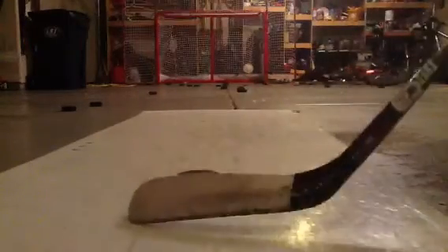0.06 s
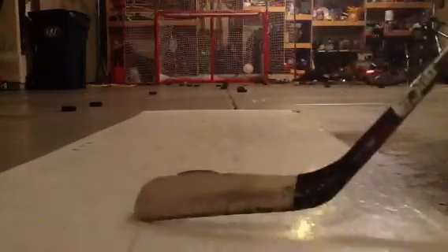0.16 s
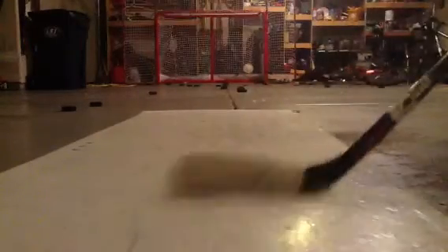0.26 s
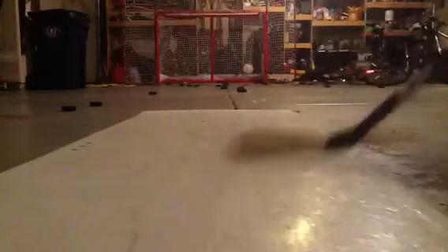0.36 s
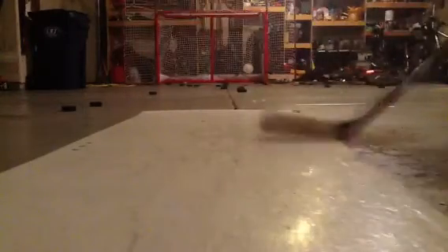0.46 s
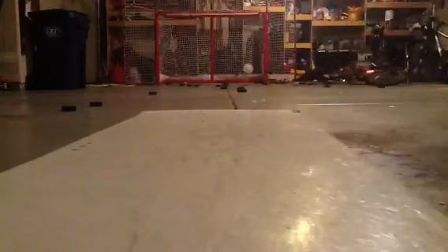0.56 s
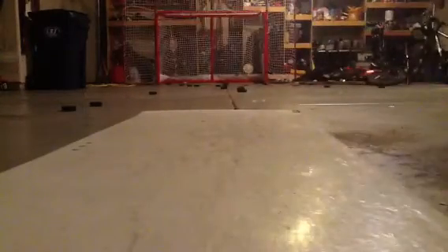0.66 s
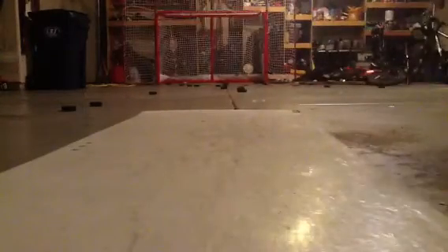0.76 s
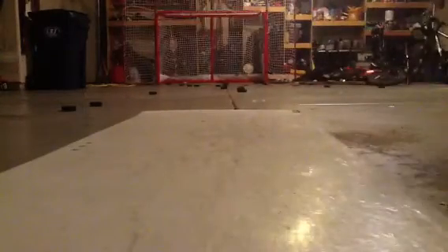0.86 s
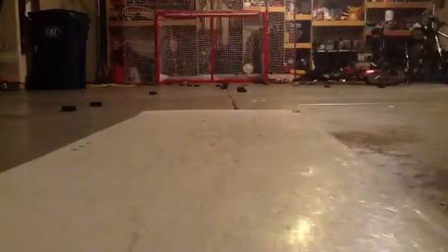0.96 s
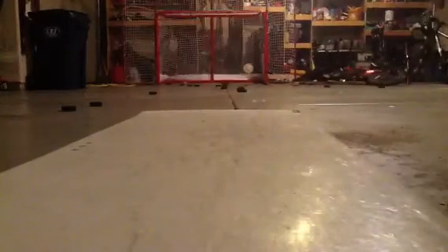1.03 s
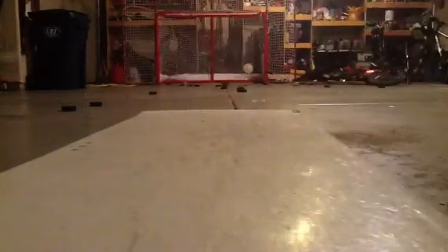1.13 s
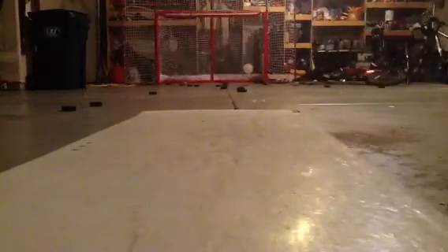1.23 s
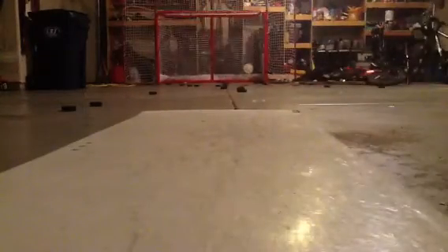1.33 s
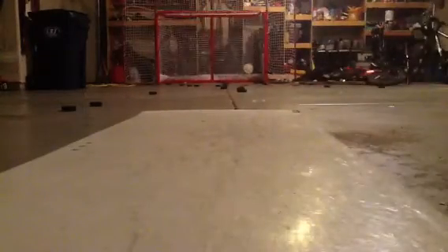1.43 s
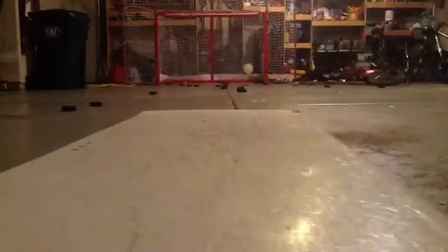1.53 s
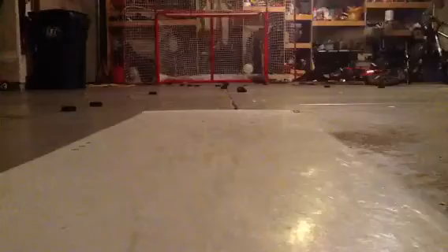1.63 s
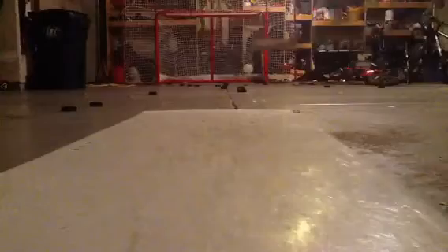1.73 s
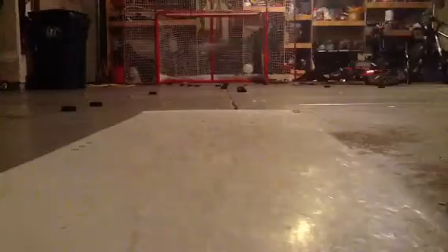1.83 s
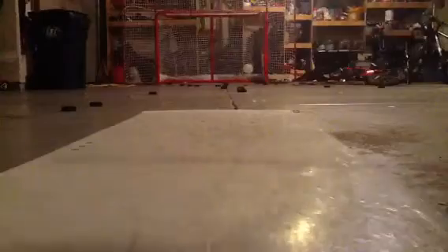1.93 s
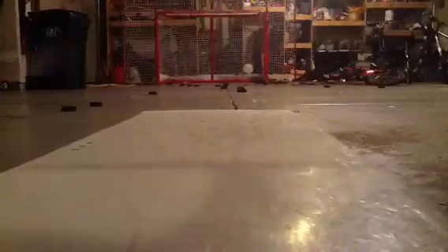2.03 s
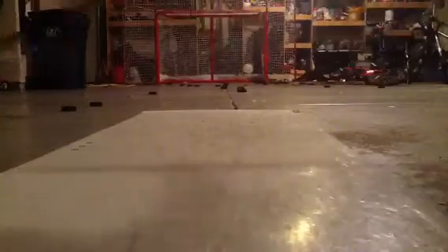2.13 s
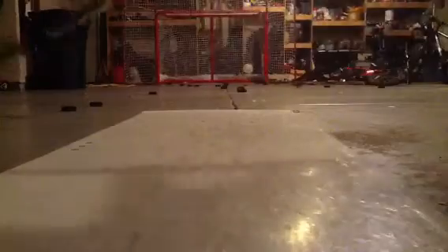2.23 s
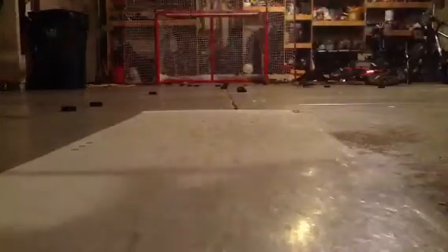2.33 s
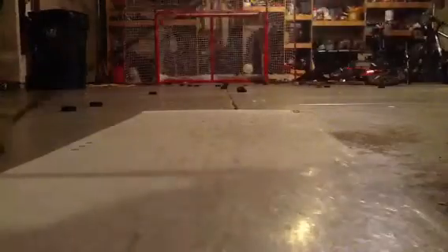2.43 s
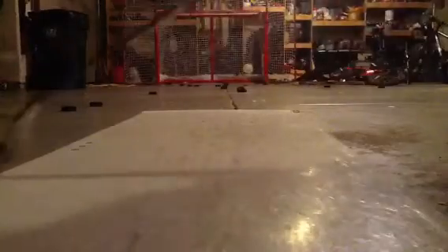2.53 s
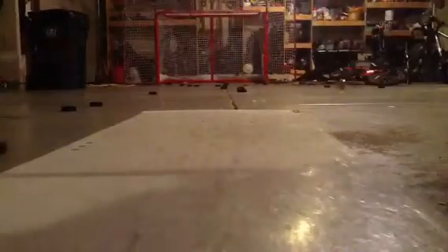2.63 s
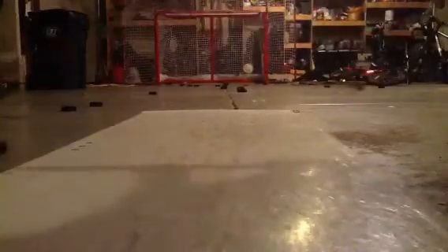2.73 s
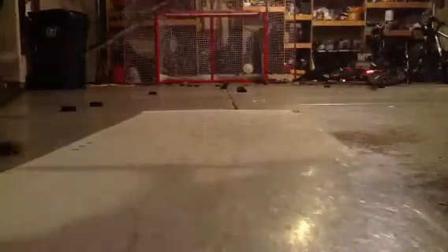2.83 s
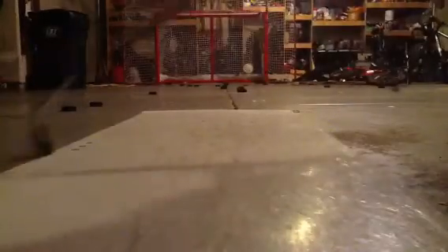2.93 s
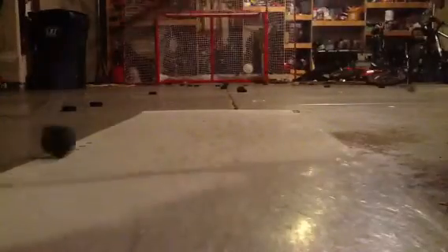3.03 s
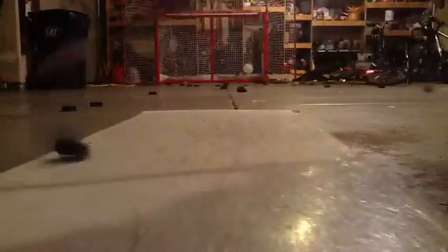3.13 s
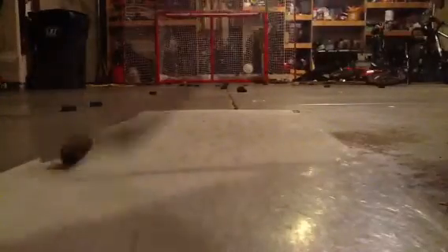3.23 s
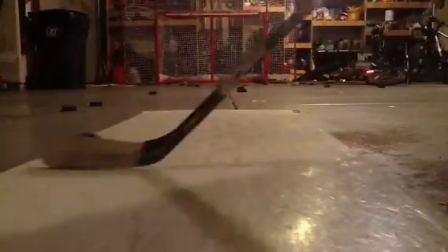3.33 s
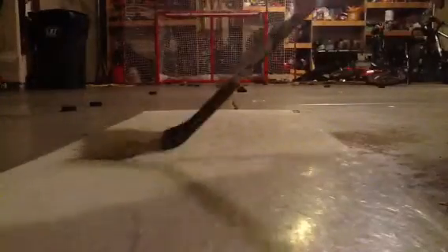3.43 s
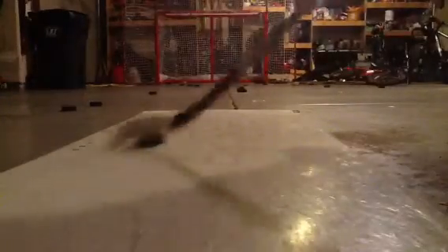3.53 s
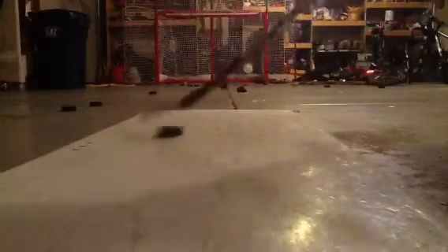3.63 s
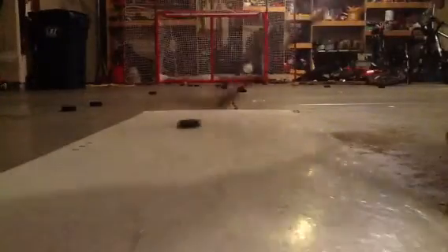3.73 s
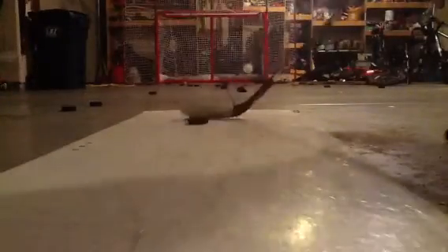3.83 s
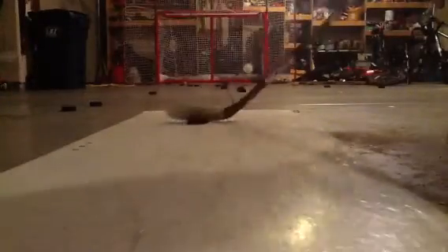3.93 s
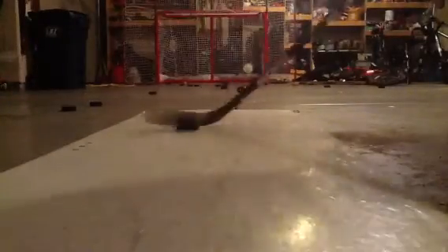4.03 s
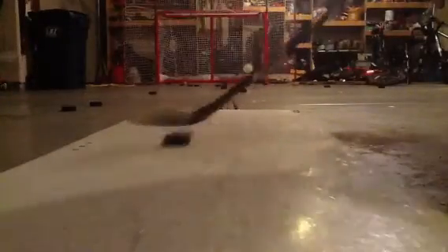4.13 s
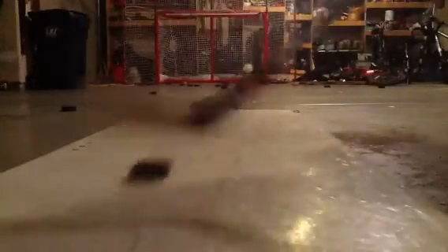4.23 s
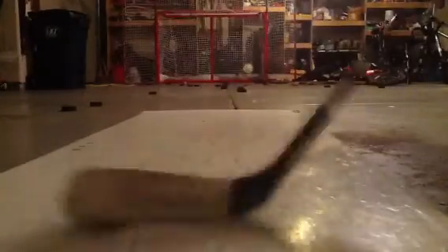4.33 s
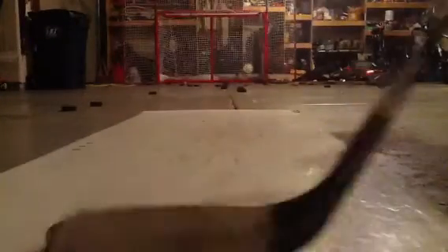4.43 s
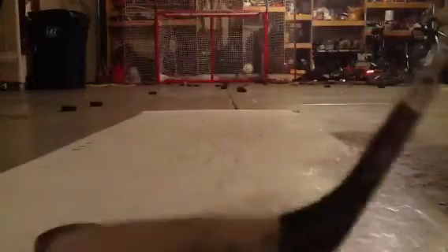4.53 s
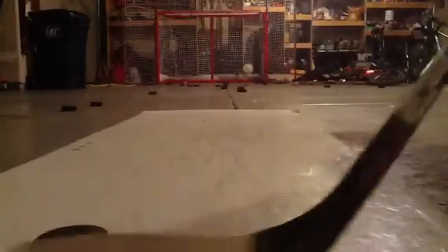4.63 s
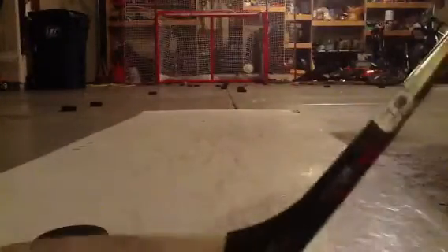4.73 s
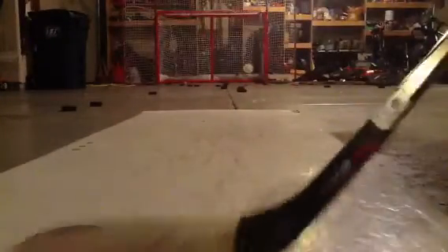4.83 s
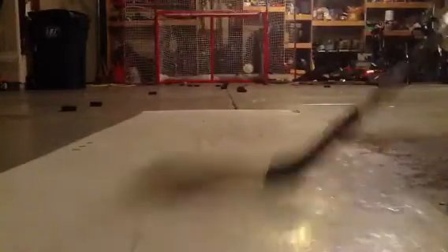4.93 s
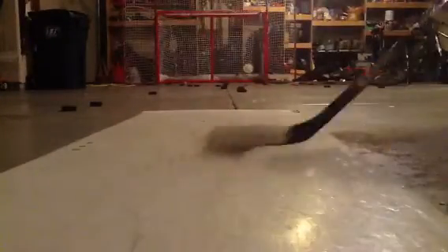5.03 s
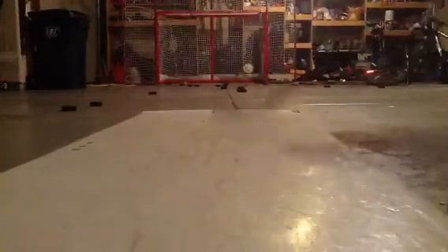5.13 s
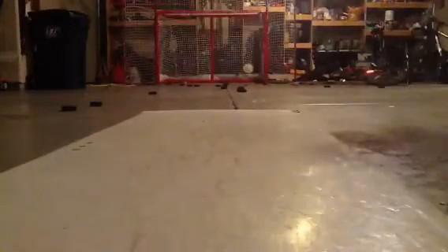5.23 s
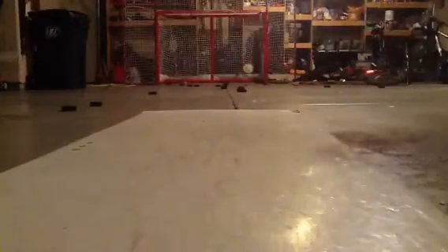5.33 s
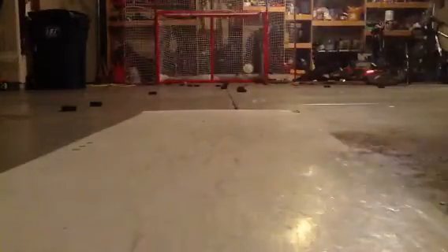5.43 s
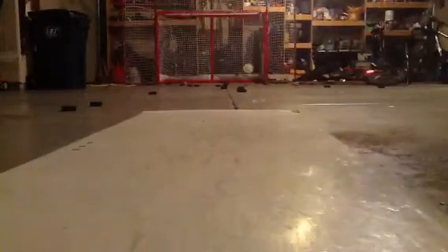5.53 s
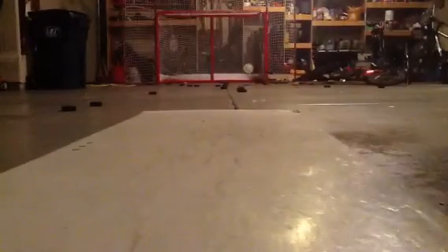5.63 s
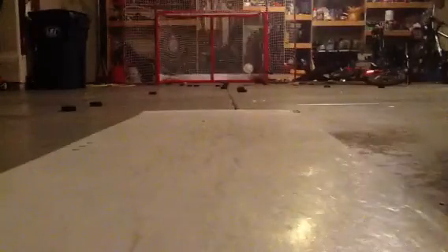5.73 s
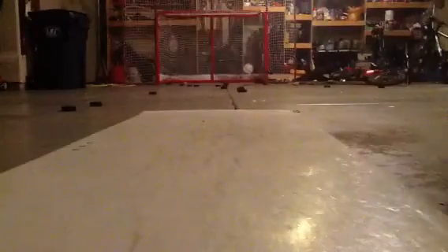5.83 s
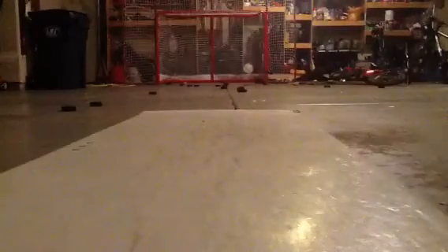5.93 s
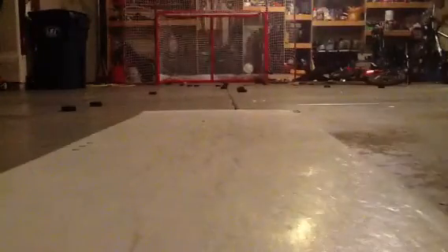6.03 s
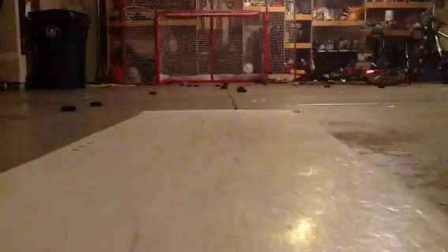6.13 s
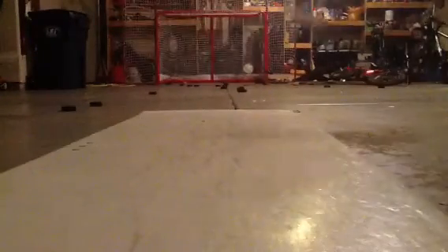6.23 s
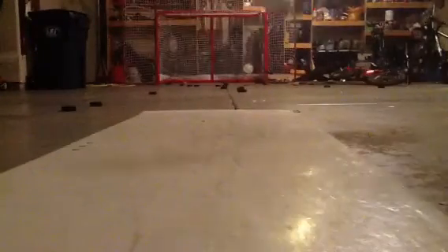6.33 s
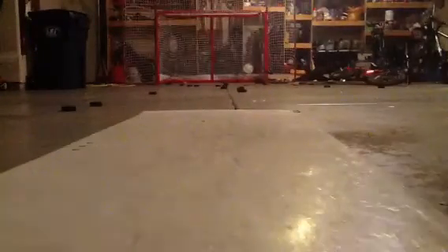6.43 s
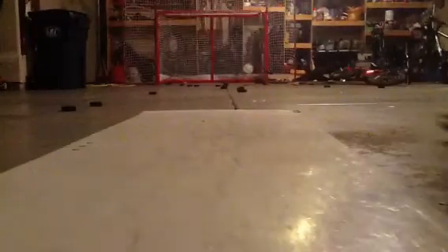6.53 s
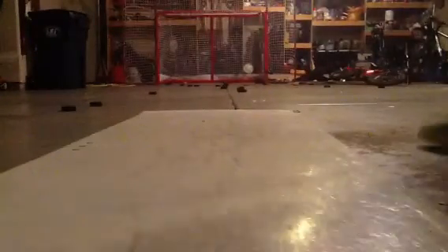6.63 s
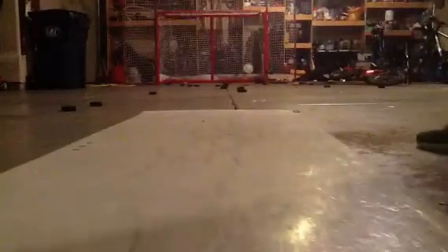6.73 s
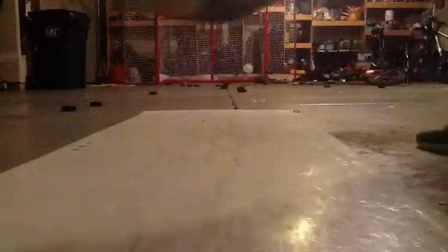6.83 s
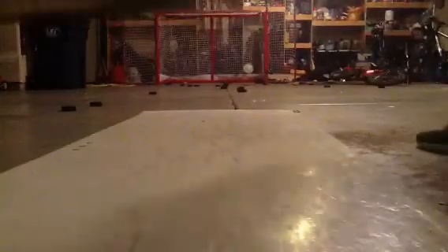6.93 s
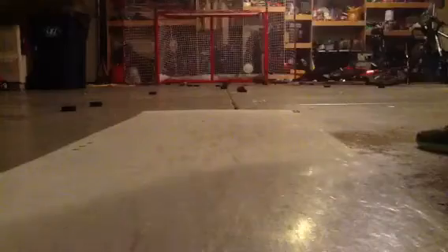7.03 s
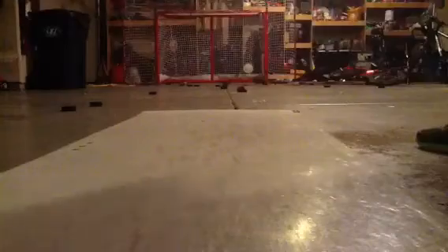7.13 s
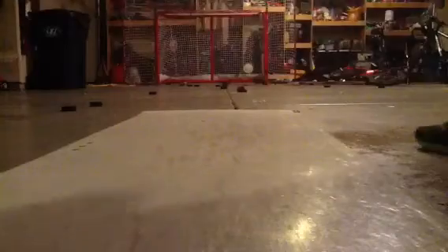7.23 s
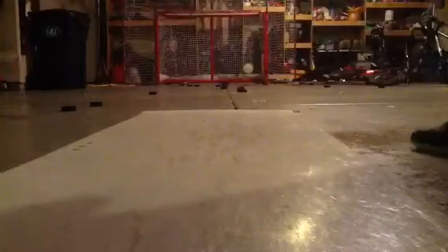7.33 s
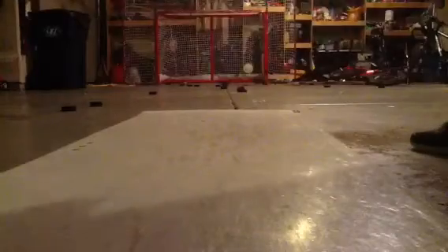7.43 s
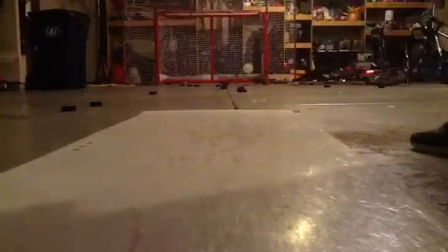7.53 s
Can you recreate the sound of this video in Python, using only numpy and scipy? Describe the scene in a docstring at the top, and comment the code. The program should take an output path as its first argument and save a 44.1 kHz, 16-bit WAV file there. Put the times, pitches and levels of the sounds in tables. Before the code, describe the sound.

Heard close to the floor in a small bare garage, a taped hockey blade rasps and slaps a puck away; it swishes into the net and thumps and tumbles at the far end. After a short lull come hard taps, gritty slides, a squeaky fierce scrape and a sharp double slap, then heavy distant thuds. Faint scuffs and one last clack follow over quiet hiss.

```python
"""Hockey practice in a small garage

Heard from floor level beside a plastic shooting board: a taped blade drags, taps and slaps pucks.
The rasp and swishes are coloured noise, the blows are short chatter with ringing modes,
and the thumps are swelling bands of noise with a hollow note. Pucks swish into the net, thump against
the far end and tumble; the bare room rings after every blow as decaying noise. A quiet hiss lies below."""
import sys
import numpy as np
from scipy import signal
from scipy.fft import rfft, irfft, next_fast_len
from scipy.io import wavfile
from scipy.ndimage import uniform_filter1d

SR = 44100
rng = np.random.default_rng(int(sys.argv[2]) if len(sys.argv) > 2 else 0)


def transcribe(u):
    """Save the signal u as a 16-bit wav file named by the first command-line argument.

    u: samples, shape (n,) or (channels, n), limited to [-1, 1]; the rate is SR.
    q: integer samples, one column per channel.
    """
    v = np.clip(np.atleast_2d(u).T, -1, 1)
    q = np.round(v * 32767).astype(np.int16)
    wavfile.write(sys.argv[1], SR, q)


N = 334392
TIME = np.arange(N) / SR
BITE_DB_PER_S, LIFT_DB_PER_S = 325.5, 420.5  # how fast the blade takes hold and lets go


def amp(db):
    """Decibels to gain."""
    return 10 ** (np.asarray(db) / 20)


def unit(x):
    """Scales to rms 1."""
    return x / np.sqrt(np.mean(x ** 2) + 1e-20)


def read(points, hz):
    """Reads a table of (Hz, value) on a log-frequency axis."""
    f, value = np.transpose(points)
    return np.interp(np.log(hz + 1), np.log(f + 1), value)


def add(mix, start_s, sound):
    """Mixes a sound in at a time."""
    part = mix[max(round(start_s * SR), 0):][:len(sound)]
    part += sound[:len(part)]


def shape(x, points):
    """Filters x by a table of (Hz, dB)."""
    size = next_fast_len(len(x))
    gain = amp(read(points, np.fft.rfftfreq(size, 1 / SR)))
    return irfft(rfft(x, size) * gain, size)[:len(x)]


def colour(x, points):
    """Filters x by a table of (Hz, dB), then scales it to rms 1."""
    return unit(shape(x, points))


def band(x, lo_hz, hi_hz, order=3):
    """Causal band-pass."""
    edges = [lo_hz, min(hi_hz, .48 * SR)]
    return signal.sosfilt(signal.butter(order, edges, "band", fs=SR, output="sos"), x)


def wander(count, size):
    """Smooth chance of rms 1 that changes over about size samples."""
    noise = rng.standard_normal(count)
    return unit(uniform_filter1d(uniform_filter1d(noise, size), size))


def gesture(start_s, length_s, db, swell_db, attack_db_per_s, release_db_per_s):
    """Gain of one motion: a rise up to start_s, a hold that swells or sags, then a release."""
    end_s = start_s + length_s
    hold = db + swell_db * np.clip((TIME - start_s) / length_s, 0, 1)
    attack = attack_db_per_s * np.clip(start_s - TIME, 0, 1)
    release = release_db_per_s * np.clip(TIME - end_s, 0, 1)
    return amp(hold - attack - release)


def hiss(level_db=-59):
    """Steady background noise with a fixed spectrum."""
    # colour of the hiss: hz, relative_db
    hiss_colour = [(25, -23), (70, -11.5), (180, 17), (400, 4.5), (800, -12), (2000, -3.5), (5000, -12),
                   (10000, -11.5), (15500, -11)]
    return amp(level_db) * colour(rng.standard_normal(N), hiss_colour)


def garage_tail(build_s=0.002):
    """The dense ring of the bare room: freshly drawn noise whose highest treble dies first."""
    # decay of the bare room: hz, t60_s
    room_decay = [(120, 0.5), (350, 0.93), (1000, 0.82), (2800, 0.89), (5000, 0.77), (9000, 0.57),
                  (15000, 0.16)]
    t, hz = np.arange(0, SR, 256) / SR, np.fft.rfftfreq(512, 1 / SR)[:, None]
    real, imag = rng.standard_normal((2, len(hz), len(t)))
    decay = amp(-60 * t / read(room_decay, hz))
    tail = signal.istft((real + 1j * imag) * decay, nperseg=512)[1]
    return 0.00099 * (1 - np.exp(-TIME[:len(tail)] / build_s)) * tail


def garage(x):
    """Reverberation of the longer sounds: each moment sets off the coloured ring of the room."""
    # colour of the reverberation: hz, gain_db
    room_colour = [(100, 4), (220, -0.5), (450, -1.5), (1000, -3.5), (2800, -3), (6000, -6.5),
                   (13000, -0.5)]
    return signal.fftconvolve(x, shape(garage_tail(), room_colour))[:N]


def net(flutter_db=0.5, rise_db_per_s=676, sag_db_per_s=23, settle_db_per_s=218):
    """Mesh and backing are jolted, rustle unevenly and settle; a faint shoe scuff shares their coloured noise."""
    # swishes of the net and its backing, and a faint shoe scuff near 6.7 s, before the mix:
    # start_s, length_s, level_db
    swishes = [(1.06, 0.091, -45), (5.601, 0.19, -48.5), (5.861, 0.016, -46.5), (6.667, 0.092, -66)]
    # colour of the rustle: hz, relative_db_per_hz
    net_colour = [(290, -34), (500, -4), (646, -9), (1240, -1.5), (1350, -2.5), (2800, -4), (4050, -13),
                  (5780, -10), (15000, -24.5)]
    sway = sum(gesture(start_s, length_s, db, -sag_db_per_s * length_s, rise_db_per_s, settle_db_per_s)
               for start_s, length_s, db in swishes)
    flutter = amp(flutter_db * wander(N, size=300))
    return sway * flutter * colour(rng.standard_normal(N), net_colour)


def contacts(gap_s=.05, slowing=1.1):
    """Each thump as its contacts: perhaps an edge first, the full landing, then ever slower and weaker rebounds."""
    # pucks landing and feet, before the mix; an edge lead counts above gap_s / 10, a tumble above gap_s:
    # start_s, boom_db, knock_re_boom_db, tick_re_boom_db, edge_lead_s, tumble_s
    landings = [(1.058, -37.5, -15, -21, 0.00024, 0), (1.116, -47.5, -18, 2.5, 0.000056, 0),
                (1.461, -31.5, -21, -18.5, 0.018, 0), (1.591, -52, -12, -13, 0.00053, 0),
                (1.712, -42, -20, -14.5, 0.00079, 0), (1.732, -39.5, -24, -16, 0, 0),
                (1.802, -53.5, -1, -1.5, 0.0011, 0), (1.888, -39, -20, -23, 0.00083, .33),
                (2.048, -57, -11, 2.5, 0.0043, 0), (2.32, -39.5, -5.5, -43, 0, 0),
                (4.546, -33, -2, -17, 0.0016, 0), (4.601, -33, -23, -20, 0.0039, 0),
                (4.679, -38, -11, -12, 0, 0), (5.6, -33.5, -17, -12, 0, .07),
                (5.851, -27, -6, -15.5, .015, .13), (6.222, -32, -20, -25, .02, 0),
                (6.374, -40.5, -35, -42, 0.00064, 0), (6.491, -53.5, -9, -26, 0.0017, 0),
                (7.04, -57, -22, -18, 0.0012, 0), (7.08, -56, -28, -18, 0.0015, 0.089),
                (7.279, -57.5, -10, -19, 0.004, 0), (7.556, -54, -6, -15, 0, 0)]
    edge_db, edge_knock_db, edge_tick_db = -15, 1.5, -23  # boom re the landing; knock and tick re that boom
    rebound_db, fade_db = -5.5, -7  # a rebound re its landing, and the further loss over the tumble
    rebounds_s = np.cumsum(gap_s * slowing ** np.arange(10))  # each gap is longer than the last
    for start_s, boom_db, knock_db, tick_db, lead_s, tumble_s in landings:
        if lead_s > gap_s / 10:
            yield start_s - lead_s, boom_db + edge_db, edge_knock_db, edge_tick_db
        yield start_s, boom_db, knock_db, tick_db
        for after_s in rebounds_s:
            if after_s < tumble_s:
                weaker_db = boom_db + rebound_db + fade_db * after_s / tumble_s
                yield start_s + after_s, weaker_db, knock_db, tick_db


def thumps(rise_s=.01, knock_s=0.0051, tick_s=0.014, panel_hz=215, panel_db=-4.5, panel_s=0.0064):
    """Soft, heavy blows: a quick knock and a hollow low note in a boom that swells and dies, with a little rattle."""
    out = np.zeros(N)
    t = np.arange(SR // 5) / SR
    # each envelope peaks at its own time
    swell, rap, snap, hollow = (t / s * np.exp(1 - t / s) for s in (rise_s, knock_s, tick_s, panel_s))
    for start_s, boom_db, knock_db, tick_db in contacts():
        noise = rng.standard_normal(len(t))
        note_hz = panel_hz * (1 + 0.073 * rng.standard_normal())
        note = np.sin(2 * np.pi * note_hz * t) * hollow
        boom = band(noise, 152, 427, order=2) * swell
        knock = band(noise, 290, 1010) * rap
        tick = band(noise, 1500, 6800, order=1) * snap
        parts = [(note, panel_db), (boom, -2), (knock, knock_db - 1), (tick, tick_db)]
        add(out, start_s, sum(amp(boom_db + db - 13) * unit(part) for part, db in parts))
    return band(out, 103, 16000, order=2)


def rubbing(glide_fade_db_per_s=45.5):
    """Gains of rasp and grit: blade strokes give both, a puck gliding on alone and slowed by friction only grit."""
    # strokes of the blade over the board, before the mix:
    # start_s, length_s, rasp_db, swell_over_stroke_db, grit_re_rasp_db
    strokes = [(.01, 0.061, -50, -2, 2), (0.209, 0.088, -56.5, 14, -3.5), (0.318, .22, -36, 2.5, -14),
               (2.682, 0.0092, -57.5, 1.5, -13), (2.83, 0.088, -57, 3, -3), (3.183, .04, -54, -4, -5),
               (3.5, 0.46, -44, -6.5, 2), (3.95, 0.11, -49, 8, 0), (4.022, 0.078, -36.5, -1, -5),
               (4.177, 0.13, -37.5, 11, -7.5), (4.933, 0.07, -20, -5.5, -14.5),
               (5.024, 0.099, -32, -1.5, -10), (7.296, 0.027, -55.5, -1, -1), (7.407, .02, -53, -6, 8)]
    # gritty scuffs of struck pucks gliding on, before the mix: start_s, length_s, level_db
    glides = [(.53, .08, -38.5), (3.32, 0.14, -37.5), (3.92, 0.35, -34), (4.43, 0.62, -40),
              (5.17, 0.079, -42)]
    rasp, grit = np.zeros((2, N))
    for start_s, length_s, db, swell_db, grit_db in strokes:
        stroke = gesture(start_s, length_s, db, swell_db, BITE_DB_PER_S, LIFT_DB_PER_S)
        rasp = np.maximum(rasp, stroke)
        grit = np.maximum(grit, amp(grit_db) * stroke)
    for start_s, length_s, db in glides:
        fade_db = -glide_fade_db_per_s * length_s
        grit = np.maximum(grit, gesture(start_s, length_s, db, fade_db, BITE_DB_PER_S, LIFT_DB_PER_S))
    return rasp, grit


def slide(rasp_gain, grit_gain, grains_per_s=3500, judder_db=1.5, smooth=0.92,
          snags_per_s=30, snag_db=6, snag_s=0.0026):
    """Tape catches on scratches in the plastic: dense tiny slips and a few deeper snags, bright with grit below."""
    # colour of the bright rasp: hz, relative_db_per_hz
    rasp_colour = [(1760, -47), (3000, -14), (4570, -10.5), (6090, -8.5), (6670, -5), (8400, -3),
                   (10700, 3.5), (13700, -7), (14900, -5.5), (15700, -21.5), (16000, -51)]
    # colour of the grit below it: hz, relative_db_per_hz
    grit_colour = [(60, -41.5), (130, -13.5), (250, -11), (700, -11), (1200, 3), (1650, -5.5), (2400, -3.5),
                   (3300, -7.5), (4800, -9.5), (8000, -18), (14000, -54)]
    slips = rng.standard_normal(N) * (rng.random(N) < grains_per_s / SR)
    snag_starts = rng.random(N) < snags_per_s / SR
    snags = signal.lfilter([1], [1, -np.exp(-1 / (snag_s * SR))], 1e-12 + snag_starts)
    friction = unit(slips) + smooth * rng.standard_normal(N)
    friction *= amp(snag_db * np.minimum(snags, 1))
    rasp = colour(friction * amp(judder_db * wander(N, size=200)), rasp_colour)
    grit = colour(friction * amp(judder_db * wander(N, size=200)), grit_colour)
    return rasp_gain * rasp + grit_gain * grit


def chirps(rasp_gain, per_s=130, length_s=0.015, glide=0.097, level_db=-15, spread_db=12):
    """Wherever the blade slides, threads of tape give tiny rising squeals that follow the gain of the rasp."""
    out = np.zeros(N)
    u = np.linspace(0, 1, int(length_s * SR))
    for when, pitch, size in rng.random((int(per_s * N / SR), 3)):
        hz = (3000 + 8000 * np.sqrt(pitch)) * (1 + glide * u)
        gain = rasp_gain[int(when * N)] * amp(level_db + spread_db * size ** 2)
        whistle = np.sin(2 * np.pi * np.cumsum(hz) / SR)
        add(out, when * N / SR, gain * np.sin(np.pi * u) * whistle)
    return out


def squeaks(waver=0.042, octave_db=-3, broken_db=4):
    """Stick and slip briefly fall into step: a rough, broken rising whistle and its octave."""
    # squeaks of the tape as the blade speeds up, before the mix:
    # start_s, length_s, start_pitch_hz, end_pitch_hz, level_db
    whistles = [(4.018, 0.041, 4360, 5250, -39), (4.313, 0.03, 6510, 6860, -27),
                (4.902, 0.075, 2203, 2513, -33.5), (4.912, 0.019, 3160, 3460, -25.5),
                (4.935, 0.072, 8430, 9850, -24), (4.976, 0.023, 4370, 5440, -30)]
    out = np.zeros(N)
    for start_s, length_s, start_hz, end_hz, db in whistles:
        count = int(length_s * SR)
        hz = np.linspace(start_hz, end_hz, count) * (1 + waver * wander(count, size=20))
        phase = 2 * np.pi * np.cumsum(hz) / SR
        grip = amp(db + broken_db * wander(count, size=120)) * signal.windows.tukey(count, .6)
        add(out, start_s, grip * (np.sin(phase) + amp(octave_db) * np.sin(2 * phase)))
    return out


def blows(contact_s=0.0019, chatter=0.84, ring=0.12, main_ring=0.19, main_t60=0.07,
          rattle=0.022, rattle_s=0.0093, room_gain_db=71, ripple_db=2.5, snap_lift_db=1.5):
    """A sharp contact with a few ms of chatter rings blade and board; each blow has its own room tail of noise."""
    # blade, puck and shoe on the board, before the mix: start_s, knock_db, thud_re_knock_db,
    # crack_re_knock_db, crack_tilt_db_per_octave, relative_room_db, main_ring_hz
    hits = [(.098, -48, -8.5, -24, -6, 2, 1280), (0.1226, -50, -14.5, -13, -3, -1, 1220),
            (0.2698, -56.5, -24, 3, 4, -13, 2328), (0.286, -54.5, -31, 9.5, 0.5, -15, 2340),
            (0.3118, -27, 2, -9, -8, -5, 742), (0.3457, -31, -20, -5, -3, 1.5, 1190),
            (0.4811, -22.5, -13.5, -2.5, -9, 2, 2284), (.549, -23, -10, -5.5, -3, 2, 1260),
            (2.3124, -36.5, 3.5, 1, -5.5, -3, 2420), (2.412, -28, -9.5, 5, -5.5, -0.5, 1103),
            (2.4228, -29, -2, 5, -8.5, -13, 1410), (2.7766, -26.5, -5, 1, -6, -4, 1120),
            (2.9288, -28, -5, -13, -0.5, 4.5, 1134), (3.0312, -42, -19, -9, 3.5, -9, 1000),
            (3.274, -31.5, -16, -1.5, 5.5, -5, 1157), (3.29, -35, -12.5, -2, -11, 2, 1500),
            (3.3415, -34.5, -12.5, -7, -2.5, 1.5, 1204), (3.4618, -40, -5, -14.5, 6, 6, 1200),
            (3.836, -24, -11.5, -7.5, -9, 4, 838), (3.869, -28, -14, -15, -6, -3, 1500),
            (3.9262, -25, -3, -18, 4, -1, 808), (4.1498, -48, 0, -1, 6, -4, 1070),
            (4.187, -49, -1, 6, -0.5, 3.5, 1240), (4.3401, -33, -3, 3, 3.5, -5.5, 1190),
            (4.3594, -28.5, -32, -5.5, -10.5, 0, 1479), (4.4381, -28.5, -11, -11.5, -6.5, -7, 1077),
            (4.548, -37, -2, -8, -21.5, 6, 870), (4.885, -32.5, -18, -12, -2, -11, 1170),
            (4.906, -37, -27, 0, -9, -15, 1040), (5.105, -24, -12, -7.5, -2.5, 4, 785),
            (5.143, -26, -8, -3, -2.5, 2.5, 757), (6.6651, -50, 5, -6.5, -10, -2, 1140),
            (6.768, -57.5, -12, -10, -11, -3, 1060), (7.3607, -23.5, -8, -4.5, -3, -9.5, 814)]
    # what blade and board ring with: nominal_pitch_hz, relative_db, t60_s
    board_modes = [(151, -20.5, 0.032), (237.6, -3, 0.035), (338, -1.5, 0.029), (653, -28, 0.032),
                   (824, -6.5, 0.084), (1180, 4.5, 0.034), (1459, -1.5, 0.04), (1807, -7.5, 0.08),
                   (2243, 0.5, 0.033), (2732, 0.5, 0.027), (3450, 3, 0.018), (5360, -1, .02),
                   (6630, -4, 0.016), (9540, 1, 0.019)]
    # bands of a blow, in rows knock, thud, crack, snap and tick: from_hz, to_hz
    zones = [(610, 1980), (153, 443), (2200, 4380), (4520, 7520), (7740, 12600)]
    # what a blow sends into the room: hz, gain_db
    clatter = [(60, -26.5), (130, -6.5), (220, -0.5), (480, 1), (800, -2), (1200, -1), (2400, -1),
               (4000, -2.5), (7000, -5), (11000, -3.5), (15500, -4.5)]
    # ceiling and near walls: delay_s, linear_gain
    echoes = [(.0135, 0.11), (.0165, 0.085), (.0195, .1), (.037, .05)]
    dry, room = np.zeros((2, N))
    t = np.arange(SR // 6) / SR
    first = t < .012  # the stretch that sets the level of each band
    grid = np.geomspace(100, 16000, 70)
    treble_hz = np.sqrt(np.prod(zones[2:], axis=1))
    octaves = np.log2(treble_hz / treble_hz[0])
    for start_s, knock_db, thud_db, crack_db, tilt_db, room_db, main_hz in hits:
        # the tilt carries the crack into snap and tick; the snap is lifted by a fixed amount
        treble_db = crack_db + tilt_db * octaves + np.array([0, snap_lift_db, 0])
        levels = knock_db + np.array([0, thud_db, *treble_db])
        envelope = chatter * np.exp(-t / contact_s) + rattle * np.exp(-t / rattle_s)
        hit = rng.standard_normal(len(t)) * envelope
        hit[0] += 2.5
        # each mode's pitch varies a little at random from blow to blow
        for mode_hz, db, t60 in board_modes:
            hz = mode_hz * (1 + .03 * rng.standard_normal())
            hit += ring * amp(db - 60 * t / t60) * np.sin(2 * np.pi * hz * t)
        hit += main_ring * amp(-60 * t / main_t60) * np.sin(2 * np.pi * main_hz * t)
        parts = [band(hit, lo, hi) for lo, hi in zones]
        add(dry, start_s, sum(amp(db) * part / np.std(part[first]) for part, db in zip(parts, levels)))
        # the tail carries the same balance, with a random ripple over frequency
        balance = sorted((np.sqrt(lo * hi), db - 10 * np.log10(hi - lo))
                         for (lo, hi), db in zip(zones, levels))
        rippled_db = read(balance, grid) + ripple_db * rng.standard_normal(len(grid))
        tail = shape(garage_tail(), np.transpose([grid, rippled_db]))
        add(room, start_s, amp(room_db + room_gain_db) * tail)
    out = dry + shape(room, clatter)
    for delay_s, gain in echoes:
        add(out, delay_s, gain * dry)
    return out


def scene():
    """Near sounds are mostly direct; far ones arrive largely by way of the room."""
    rasp_gain, grit_gain = rubbing()
    rasp = slide(rasp_gain, grit_gain) + squeaks() + chirps(rasp_gain)
    thud, swish = thumps(), net()
    direct = amp(1) * blows() + amp(-1.5) * rasp + amp(4.5) * thud + amp(5) * swish
    room = garage(amp(-2.5) * rasp + amp(6) * thud + amp(3.5) * swish)
    return (direct + room + hiss())[None]


def record(dry, low_cut_hz=115, edge_hz=15600):
    """A small microphone with little bass that rounds off the sharpest peaks, then the band limit."""
    thin = signal.sosfilt(signal.butter(2, low_cut_hz, "high", fs=SR, output="sos"), dry)
    rounded = .8 * np.tanh(thin / .8)
    lowpass = signal.firwin(401, edge_hz, window=("kaiser", 8), fs=SR)
    return signal.oaconvolve(rounded, lowpass[None], "same")


dry = scene()
out = record(dry)
transcribe(out)
```